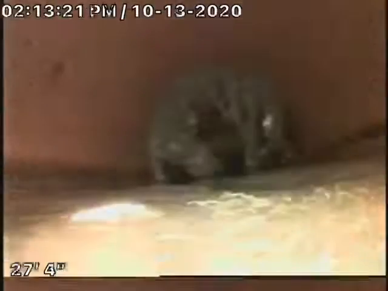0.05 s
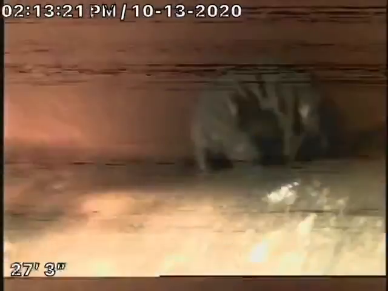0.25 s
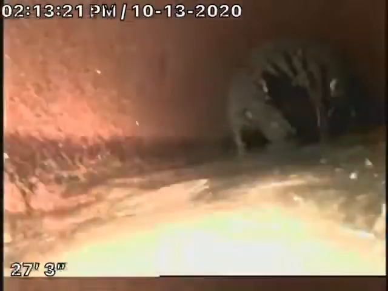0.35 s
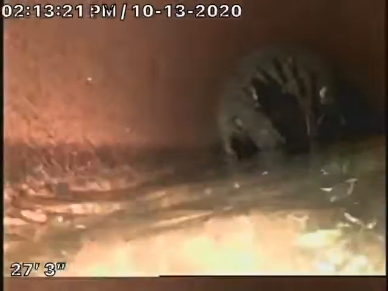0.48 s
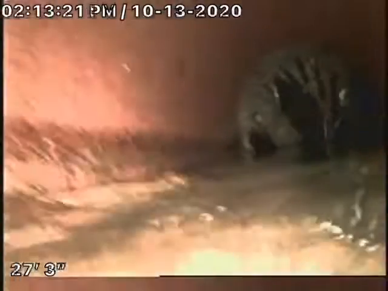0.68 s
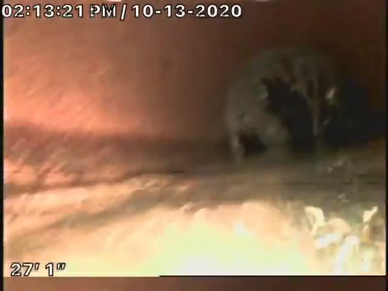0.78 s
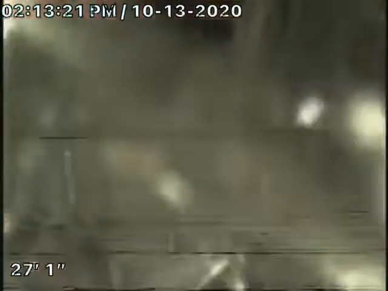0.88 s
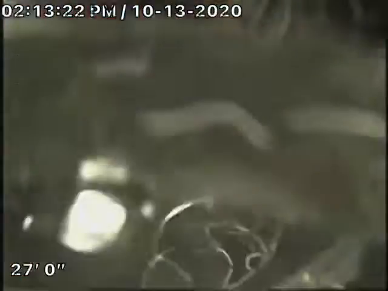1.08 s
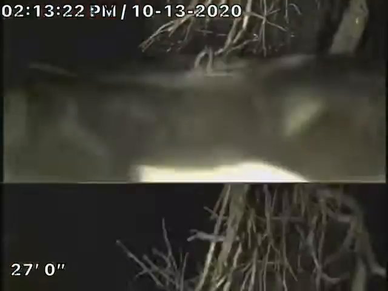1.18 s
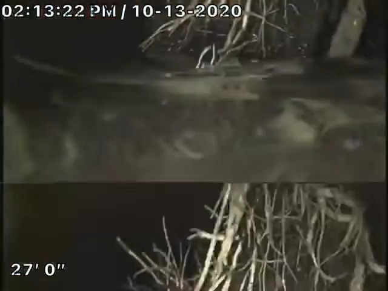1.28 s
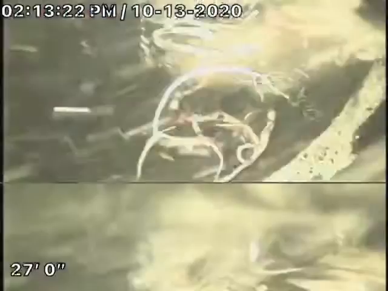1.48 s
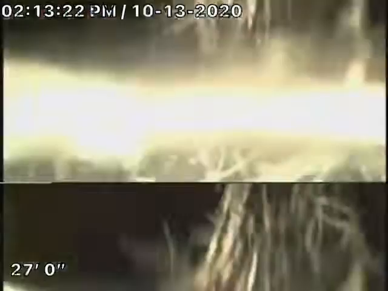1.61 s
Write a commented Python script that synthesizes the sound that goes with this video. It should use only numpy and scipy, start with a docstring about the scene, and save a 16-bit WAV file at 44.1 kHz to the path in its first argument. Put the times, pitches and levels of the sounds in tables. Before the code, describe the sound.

Cable being pulled from a pipe, rumbling low, knocking and scraping a metal frame over faint hum

```python
"""A stiff cable is drawn back through a pipe and onto its reel in a hard-walled space.
Mains hum and hiss run throughout; from 0.2 s a pull rumbles (noise through the low pipe resonances),
with knocks on the metal frame (bursts of noise that ring it). At 0.5 s the cable scrapes along the frame
(many small clicks), up to the hardest knock at 0.65 s. After a lull a second pull rumbles from 1.15 s
with softer knocks. Knocks and scrape ring out in the space (decaying bands of noise)."""
import sys
import numpy as np
from scipy import signal
from scipy.fft import rfft, irfft, next_fast_len
from scipy.io import wavfile
from scipy.ndimage import uniform_filter1d

SR = 44100
rng = np.random.default_rng(int(sys.argv[2]) if len(sys.argv) > 2 else 0)


def unload_wav(signal):
    """Save mono or channel-first audio to the path in sys.argv[1] as 16-bit WAV at rate SR, clipped to [-1, 1]."""
    wavfile.write(
        sys.argv[1],
        SR,
        np.round(np.clip(np.atleast_2d(signal).T, -1, 1) * 32767).astype(np.int16),
    )


N = 72765


def drag():
    """Rubbing keeps the pipe resonances sounding, as loud as the pull makes them."""
    # rumble through time: t/s, then level/dB of each of the five groups of resonances, lowest first
    pull_rows = [(0.0, -58, -57, -50, -62, -67), (0.036, -52, -58, -58, -57, -70),
                 (0.096, -60, -54, -50, -65, -68), (0.156, -54, -60, -53, -58, -66),
                 (0.182, -37, -45, -36, -42, -47), (0.206, -33, -39, -35, -38, -51),
                 (0.26, -43, -36, -33, -45, -52), (0.294, -37, -38, -38, -39, -50),
                 (0.32, -45, -41, -29, -40, -55), (0.348, -39, -36, -32, -42, -52),
                 (0.38, -45, -51, -36, -52, -58), (0.412, -43, -46, -35, -48, -60),
                 (0.444, -45, -50, -45, -48, -56), (0.482, -38, -41, -36, -42, -54),
                 (0.518, -47, -40, -39, -50, -57), (0.56, -43, -45, -43, -55, -61),
                 (0.596, -45, -43, -48, -45, -55), (0.652, -50, -49, -47, -48, -51),
                 (0.68, -38, -41, -56, -48, -46), (0.698, -35, -48, -62, -47, -47),
                 (0.748, -36, -47, -48, -49, -48), (0.776, -41, -58, -50, -45, -50),
                 (0.882, -57, -52, -54, -55, -58), (0.96, -55, -60, -61, -58, -62),
                 (1.042, -62, -59, -66, -64, -63), (1.12, -60, -56, -59, -61, -67),
                 (1.148, -41, -48, -44, -52, -54), (1.176, -39, -45, -39, -45, -60),
                 (1.212, -55, -43, -39, -49, -61), (1.258, -45, -44, -46, -56, -63),
                 (1.3, -46, -47, -48, -58, -70), (1.336, -44, -45, -55, -59, -66),
                 (1.368, -37, -54, -45, -60, -69), (1.406, -57, -42, -42, -56, -63),
                 (1.446, -46, -49, -47, -59, -67), (1.498, -56, -46, -53, -68, -63),
                 (1.544, -48, -53, -44, -58, -66), (1.58, -55, -44, -43, -58, -53),
                 (1.622, -45, -55, -47, -56, -62), (1.65, -50, -58, -52, -60, -60)]
    # how strongly each group is heard, added to the levels above: level/dB
    group_db = [0.1, 0.1, 0.35, -0.05, -0.2]
    # low resonances of the pipe in five groups, each row: f/Hz, width/Hz, level within the group/dB
    pipe_groups = [
        [(109.24, 15, 0)],
        [(149.7, 20, 0)],
        [(185.8, 18, -1), (203.7, 18, -2.5)],
        [(257.1, 22, -5), (310.2, 15, -5)],
        [(411.5, 104, 0)],
    ]
    smoothing_s = 0.009
    evenness = 0.85  # how steadily the rubbing drives the resonances, 0-1
    rumble = 0
    for k, group in enumerate(pipe_groups):
        pull = amp(curve(pull_rows, column=k + 1) + group_db[k])
        pull = uniform_filter1d(pull, size=int(smoothing_s * SR))
        tone = sum(amp(db) * driven(hz, width_hz) for hz, width_hz, db in group)
        rumble = rumble + pull * even(tone, evenness)
    return rumble


def knocks():
    """Each blow is a bright crack and a rough judder that ring the frame; rows: heard near, sent to space."""
    # knocks on the frame: t/s, strength/dB, relative level/dB in each of the eleven bands of bands(),
    # frame ring against the blow itself/dB (before the bands are set), judder decay time/s
    knock_rows = [(0.172, -32, -5, -14.5, -15.5, -19, -17, -33, -34, -29.5, -36, -40, -31, -2, 0.02),
                  (0.27, -14.5, -32.5, -22, -25.5, -19.5, -9, -21, -13, -26, -34, -43, -35, -5.5, 0.027),
                  (0.301, -21.5, -21, -23, -22, -10.5, -10.5, -20.5, -23, -22.5, -22.5, -30, -27, -4, 0.038),
                  (0.448, -35.5, -8.5, -12.5, -15.5, -13.5, -19, -18.5, -28, -16.5, -20, -21, -30, -7.5, 0.025),
                  (0.516, -30, -17, -12.5, -9.5, -13.5, -14, -21.5, -20.5, -28, -19, -25, -35, -7, 0.024),
                  (0.655, -5, -20.5, -20, -21.5, -22, -17, -15, -9.5, -17.5, -15, -22, -27.5, -6, 0.033),
                  (1.138, -42.5, -6, -24.5, -21, -27, -9, -17, -23, -22, -30, -15, -26, 3, 0.016),
                  (1.373, -25.5, -16.5, -15.5, -15.5, -20.5, -8, -12.5, -11.5, -19, -16.5, -23.5, -37, -4.5, 0.033),
                  (1.518, -42.5, -14, -14, -16, -16, -20, -21, -20.5, -30, -22, -4, -17, -5, 0.006),
                  (1.557, -22, -15.5, -13, -17, -21, -11.5, -16, -13, -21.5, -23, -34.5, -43, -16, 0.032)]
    crack_decay_s, crack_low_hz = 0.0052, 900
    judder_db, judder_rise_s = -8.5, 0.002
    lump_s, lump_db = 0.003, 3  # the judder comes in uneven lumps
    space_ring_db = -8  # less of the ring is sent into the space
    t = np.arange(SR // 2) / SR
    out = np.zeros((2, N + SR))
    crack_filter = signal.butter(2, crack_low_hz, "high", fs=SR)
    for start_s, strength_db, *band_db, ring_db, judder_s in knock_rows:
        crack_noise, judder_noise, lump_noise = rng.standard_normal((3, len(t)))
        crack = np.exp(-t / crack_decay_s)
        judder = amp(judder_db) * (1 - np.exp(-t / judder_rise_s)) * np.exp(-t / judder_s)
        lumps = rms_one(uniform_filter1d(lump_noise, size=int(lump_s * SR)))
        judder = judder * amp(lump_db * lumps)
        force = signal.lfilter(*crack_filter, crack_noise * crack) + judder_noise * judder

        ring_gain = amp([[ring_db], [ring_db + space_ring_db]])
        blow = rms_one(force) + ring_gain * rms_one(frame(force))
        # bands() evens out the loudness, so the size of the envelope is put back here
        size = np.sqrt(np.mean((crack + judder) ** 2))
        i = int(start_s * SR)
        out[:, i:i + len(t)] += amp(strength_db) * size * bands(blow, band_db)
    return out[:, :N]


def frame(contact):
    """A contact force sets the frame modes ringing, each with a partly random strength."""
    # frame modes: f/Hz, average level/dB, time to die away by 60 dB/s
    mode_rows = [(549, -3, .05), (755, -5, .04), (962, -5, .04), (1190, -4, .04), (1480, -3, .025),
                 (1630, -4, .035), (2790, -6, .04), (2940, 2, .06), (3070, -3, .03), (3330, -7, .03),
                 (3760, -5, .025), (4200, -6, .03), (4400, -7, .03), (4840, -10, .02)]
    spread_db = 3
    ring = 0
    for k, (hz, db, t60_s) in enumerate(mode_rows):
        width_hz = np.log(1000) / np.pi / t60_s
        strength = amp(db + spread_db * rng.standard_normal())
        # alternate signs; the root makes up for narrow modes taking in less of the force
        gain = (-1) ** k * strength * np.sqrt(SR / width_hz)
        ring = ring + gain * resonate(contact, hz, width_hz)
    return ring


def scrape():
    """The cable slides along the frame in uneven small clicks, with more treble towards the end."""
    # scrape through time: t/s, level of the lows before the overall gain/dB, treble against the lows/dB
    scrape_rows = [(.517, -41, -13), (.55, -39, -11), (.6, -40, -8), (.654, -37, -4)]
    # colour of the scrape in the eleven bands of bands(): relative level/dB
    colour_db = [-11.5, -5.5, -1.5, -1, -0.5, -3.5, 1, -3.5, 0.5, -2.5, -12.5]
    clicks_per_s, overall_db, split_hz = 6000, 0.5, 2200
    happens = rng.random(N) < clicks_per_s / SR
    sizes = amp(3 * np.minimum(rng.exponential(1, N), 4))
    clicks = happens * sizes * rng.choice([-1, 1], N)
    body = bands(rms_one(clicks) + 0.043 * rms_one(frame(clicks)), colour_db)
    lows = signal.sosfilt(signal.butter(3, split_hz, fs=SR, output="sos"), body)
    treble = signal.sosfilt(signal.butter(3, split_hz, "high", fs=SR, output="sos"), body)
    slide = rms_one(lows) + rms_one(treble) * amp(curve(scrape_rows, column=2))
    t = np.arange(N) / SR
    sliding = (t > scrape_rows[0][0]) & (t < scrape_rows[-1][0])
    return slide * sliding * amp(curve(scrape_rows, column=1) + overall_db)


def space(x):
    """Dense reflections: noise in third-octave bands, each dying away at its own rate."""
    # decay of the space: f/Hz, time to die away by 60 dB/s
    decay_rows = [(400, 0.95), (1000, 0.99), (2000, 0.83), (3300, 0.75), (4700, 1.23), (6000, 0.94)]
    space_db, rise_s = -4.5, 0.0019
    t = np.arange(SR) / SR
    edges_hz = 300 * 2 ** np.arange(0, 5, 1 / 3)
    tail = 0
    for low, high in zip(edges_hz, edges_hz[1:]):
        band_filter = signal.butter(2, [low, high], "band", fs=SR, output="sos")
        band = signal.sosfilt(band_filter, rng.standard_normal(SR))
        t60_s = at_hz(*np.transpose(decay_rows), np.sqrt(low * high))
        tail = tail + band * amp(-60 * t / t60_s)
    tail = tail * (1 - np.exp(-t / rise_s)) * np.sqrt(20 / SR)
    return amp(space_db) * signal.fftconvolve(x, tail)[:N]


def floor():
    """Wavering mains hum, made of noise in a narrow resonance, over steady coloured hiss."""
    # colour of the hiss, only the shape counts: f/Hz, relative level per Hz/dB
    hiss_rows = [(56, -56), (95, 2.5), (179, -11), (387, -21), (642, -15), (888, -18.5), (1140, -13),
                 (1300, -14), (1370, -10), (2150, -20.5), (2480, -20.5), (3020, -10), (3310, -17.5),
                 (4570, -15.5), (5990, -23), (6680, -17), (7050, -37.5), (9160, -91), (15500, -120)]
    hiss_db, hum_db = -50, -55.5
    hum_hz, hum_width_hz = 58.3, 2.7
    hiss = rms_one(shape(rng.standard_normal(N), *np.transpose(hiss_rows)))
    hum = even(driven(hum_hz, hum_width_hz), 0.7)
    return amp(hiss_db) * hiss + amp(hum_db) * hum


def bands(x, band_db):
    """Sum of steep bands, each set to its own level and moved ahead by about the lag of its filter."""
    # edges of the eleven neighbouring bands: f/Hz
    edges_hz = [480, 650, 850, 1100, 1350, 1750, 2750, 3450, 4100, 4950, 5800, 7000]
    out = 0
    for low, high, db in zip(edges_hz, edges_hz[1:], band_db):
        lag = int(0.5 * SR / (high - low))
        padded = np.concatenate([x, np.zeros(x.shape[:-1] + (lag,))], axis=-1)
        band_filter = signal.butter(4, [low, high], "band", fs=SR, output="sos")
        band = signal.sosfilt(band_filter, padded)[..., lag:]
        out = out + amp(db) * rms_one(band)
    return out


def driven(hz, width_hz):
    """Noise sent twice through a resonance, after one second to settle; rms 1."""
    noise = rng.standard_normal(N + SR)
    once = resonate(noise, hz, width_hz)
    return rms_one(resonate(once, hz, width_hz)[SR:])


def resonate(x, hz, width_hz):
    """Two-pole resonance: swings near one frequency pass best, with a gain of about 1 at the top."""
    r = np.exp(-np.pi * width_hz / SR)
    feedforward = [(1 - r * r) / 2, 0, (r * r - 1) / 2]
    feedback = [1, -2 * r * np.cos(2 * np.pi * hz / SR), r * r]
    return signal.lfilter(feedforward, feedback, x + 1e-18)


def even(x, evenness):
    """Even out part of the swings in level (0 none, 1 all); rms 1."""
    envelope = np.abs(signal.hilbert(x, next_fast_len(N))[:N])
    return rms_one(x / (envelope + 1e-9) ** evenness)


def shape(x, hz_points, db):
    """Colour a signal by a spectrum in dB."""
    f = np.fft.rfftfreq(len(x), 1 / SR)
    return irfft(rfft(x) * amp(at_hz(hz_points, db, f + 1)), len(x))


def at_hz(hz_points, values, hz):
    """Read values between given frequencies, along a logarithmic scale as in pitch."""
    return np.interp(np.log(hz), np.log(hz_points), values)


def curve(rows, column):
    """Column of a table joined by straight lines in time."""
    rows = np.array(rows)
    return np.interp(np.arange(N) / SR, rows[:, 0], rows[:, column])


def amp(db):
    """Turn decibels into a factor."""
    return 10 ** (np.asarray(db) / 20)


def rms_one(x):
    """Scale a signal to an rms (average strength) of 1."""
    return x / np.sqrt(np.mean(x ** 2) + 1e-20)


def scene():
    """Knocks, scrape and their echo, with the rumble of the drag, hum and hiss."""
    near, sent = knocks()
    slide = scrape()
    echo = space(sent + slide)
    return (near + slide + echo + drag() + floor())[None, :]


def record(dry):
    """The microphone rolls off at the top; then a steep cut."""
    mic_top_hz, cutoff_hz = 6000, 7300
    x = signal.sosfilt(signal.butter(3, mic_top_hz, fs=SR, output="sos"), dry)
    return signal.sosfilt(signal.cheby2(12, 50, cutoff_hz, fs=SR, output="sos"), x)


dry = scene()
out = record(dry)
unload_wav(out)
```